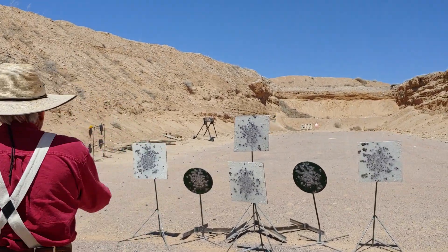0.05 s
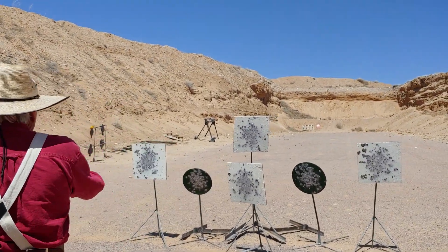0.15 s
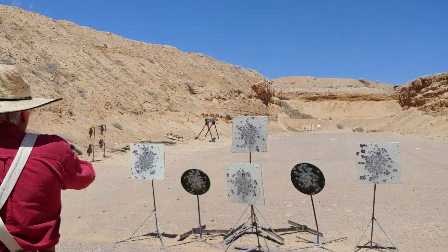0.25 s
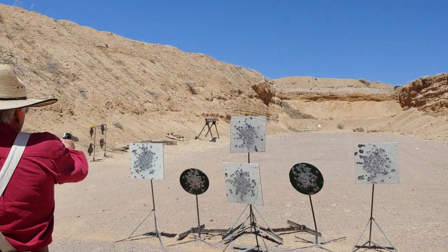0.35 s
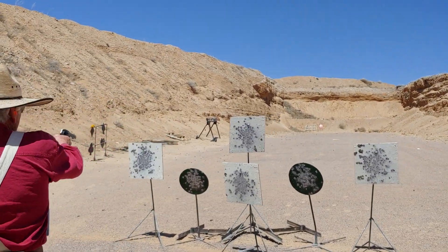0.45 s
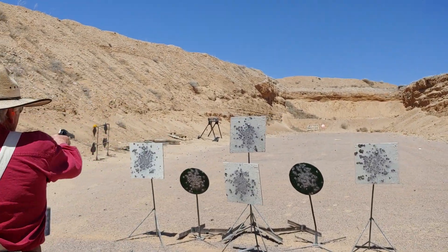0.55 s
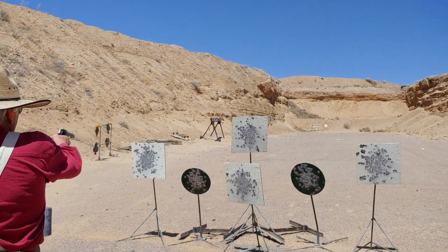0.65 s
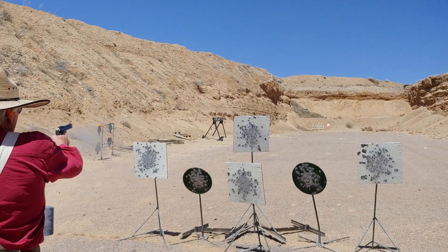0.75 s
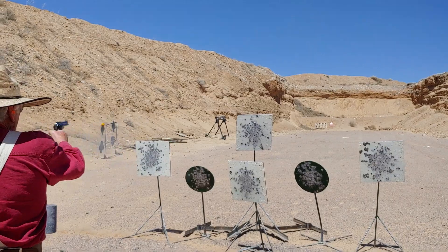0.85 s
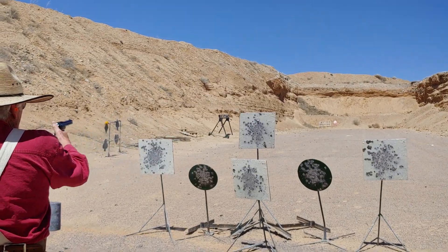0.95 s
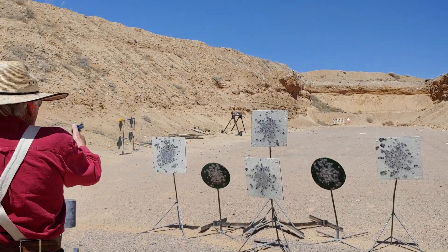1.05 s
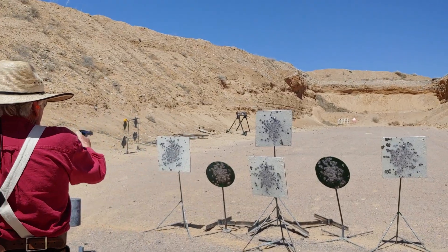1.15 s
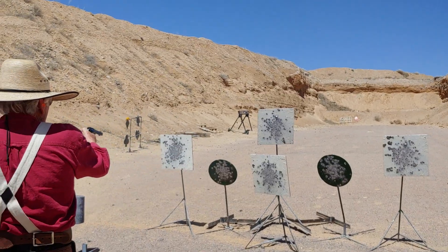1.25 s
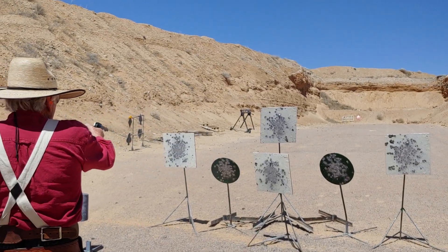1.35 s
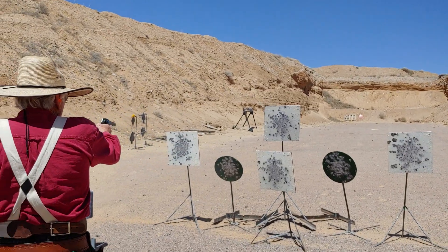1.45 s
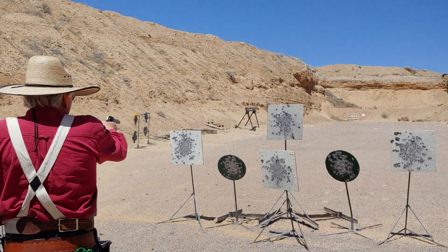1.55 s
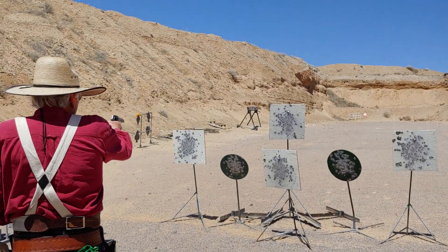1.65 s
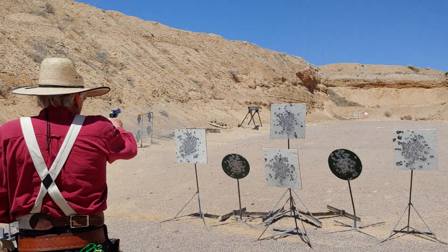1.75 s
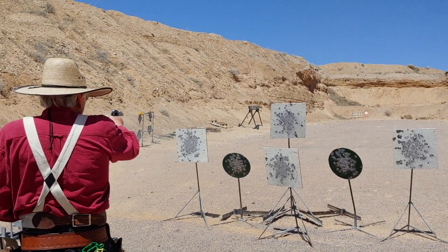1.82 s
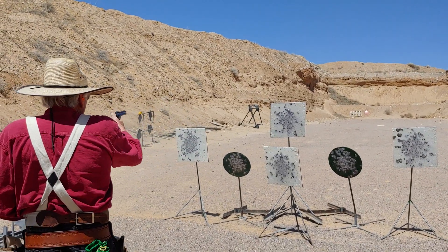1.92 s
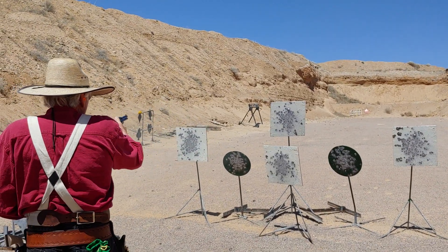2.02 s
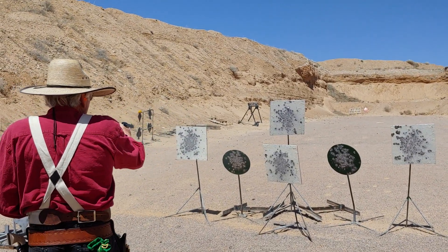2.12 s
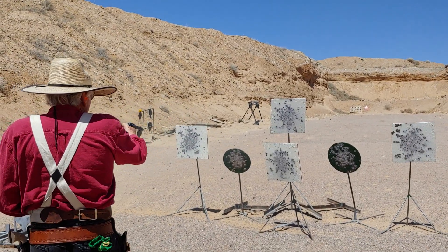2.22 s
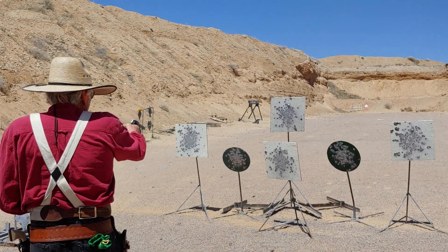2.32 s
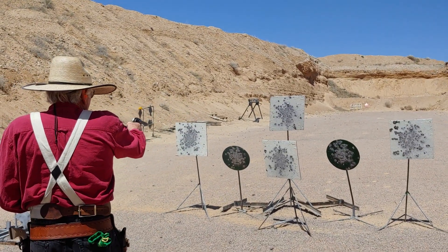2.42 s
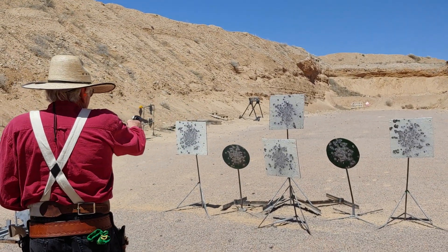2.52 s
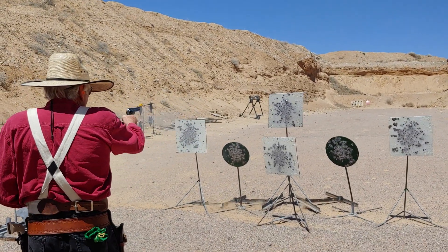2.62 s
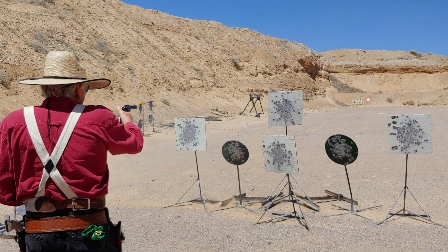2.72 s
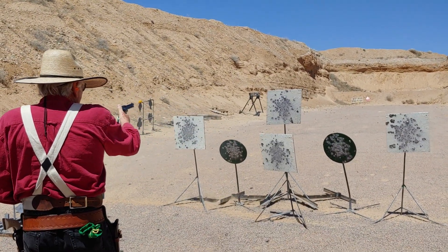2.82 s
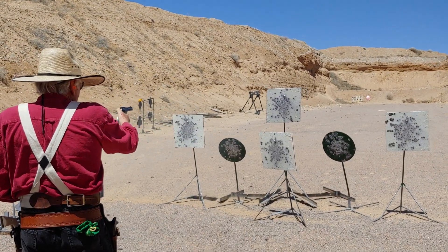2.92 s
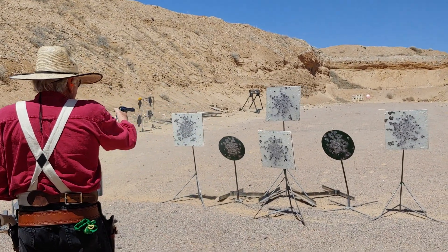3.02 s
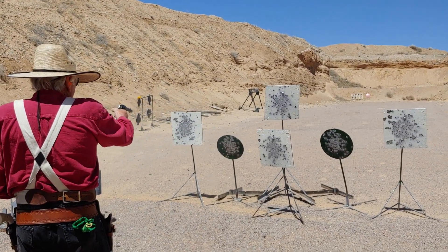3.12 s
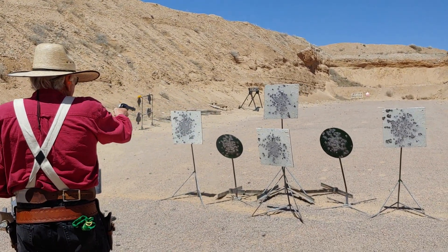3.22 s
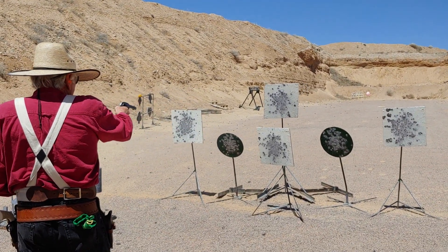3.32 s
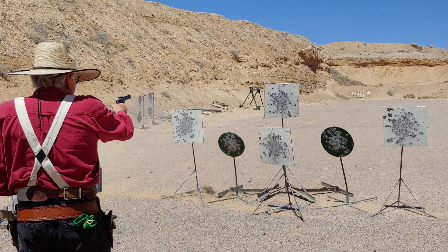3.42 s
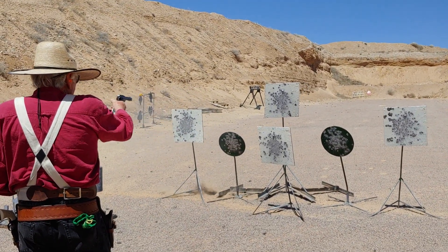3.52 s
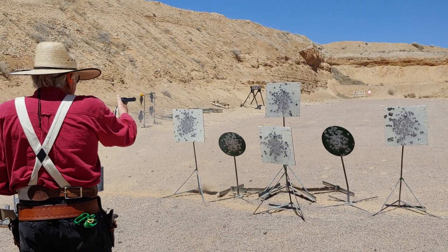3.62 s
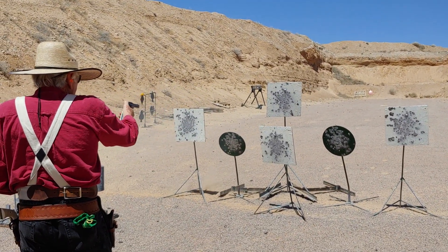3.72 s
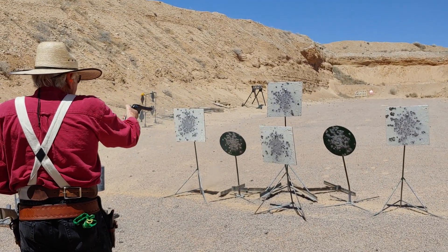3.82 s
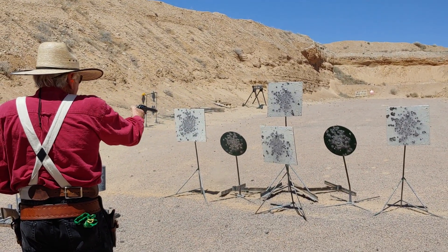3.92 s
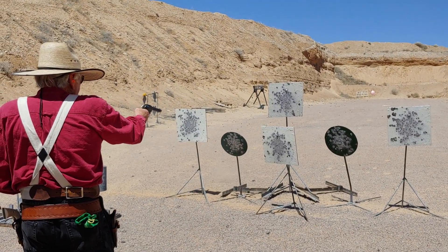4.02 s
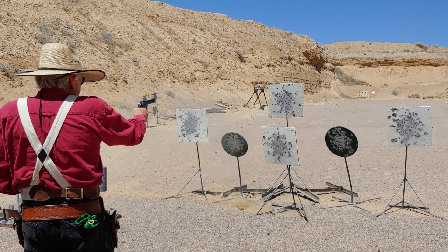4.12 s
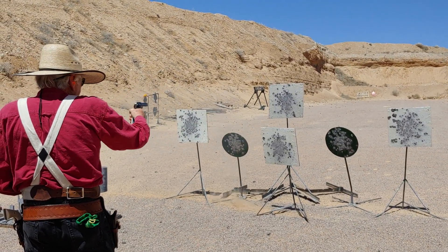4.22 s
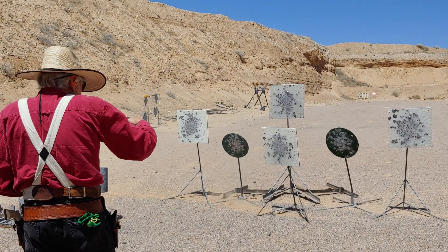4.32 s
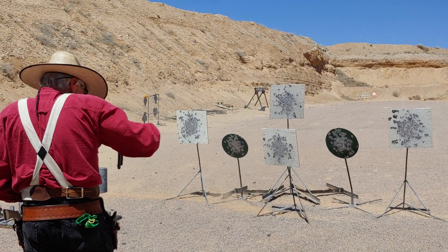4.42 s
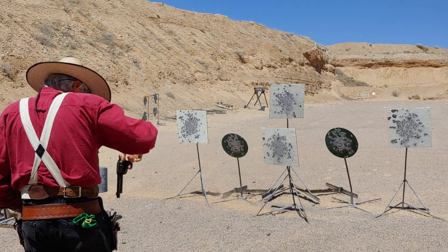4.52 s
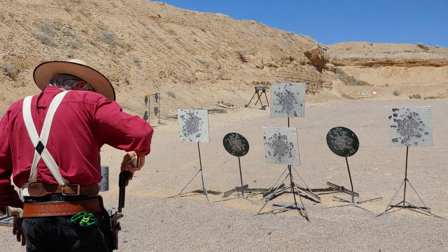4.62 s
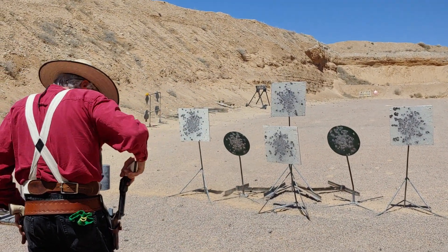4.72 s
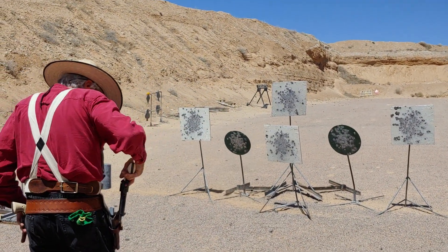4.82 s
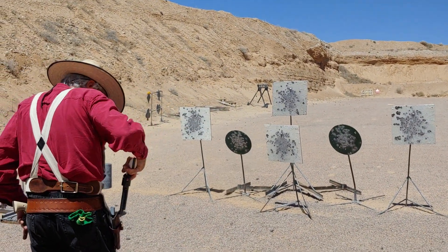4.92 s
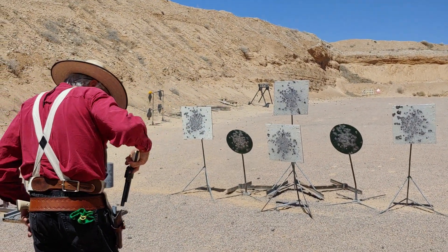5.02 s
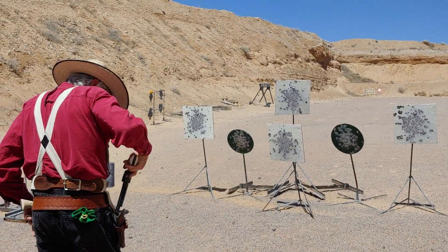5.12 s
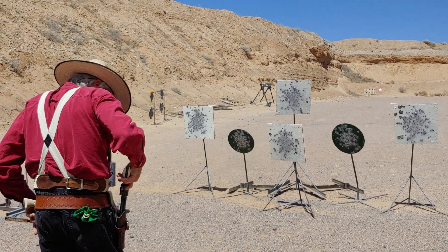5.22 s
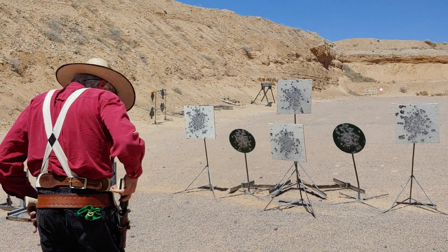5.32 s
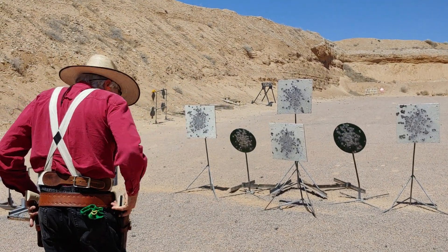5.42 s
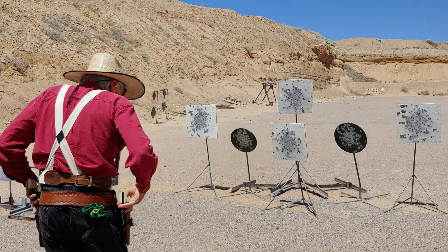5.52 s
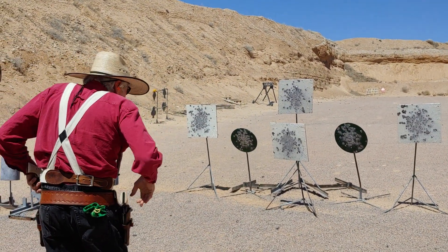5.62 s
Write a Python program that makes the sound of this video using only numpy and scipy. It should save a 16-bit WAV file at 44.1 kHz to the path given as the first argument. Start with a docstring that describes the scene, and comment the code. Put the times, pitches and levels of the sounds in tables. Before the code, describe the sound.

Leather and cloth rustle, then five sharp, overloaded gunshots clang off steel targets outdoors, with cocking clicks between them and wind rumbling on the microphone.

```python
"""Five revolver shots on an open desert range; each bullet rings one of three steel plates a few metres away.
A blast is a pressure pulse with early bounces, a gas roar and a low shove; scattered noise washes back
from the dirt banks and a dull copy returns from a far cliff. The plates ring as banks of dying modes.
Hammer notches, leather and cloth are shaped noise, a metal fitting jingles, and wind buffets two microphone
ports over a far murmur. A gain control ducks on loud sound and recovers."""
import sys
import numpy as np
from scipy import signal
from scipy.fft import rfft, irfft
from scipy.io import wavfile
from scipy.ndimage import uniform_filter1d

SR = 44100
rng = np.random.default_rng(int(sys.argv[2]) if len(sys.argv) > 2 else 0)


def transcribe(u):
    """Save the signal u as a 16-bit wav file named by the first command-line argument.

    u: samples, shape (n,) or (channels, n), limited to [-1, 1]; the rate is SR.
    q: integer samples, one column per channel.
    """
    v = np.clip(np.atleast_2d(u).T, -1, 1)
    q = np.round(v * 32767).astype(np.int16)
    wavfile.write(sys.argv[1], SR, q)


N = 249673

# The five shots. Each row: muzzle blast in seconds, bullet heard landing in seconds.
SHOT_TIMES = [(.8351, .8594), (1.778, 1.8023), (2.6375, 2.6602), (3.453, 3.4760), (4.1441, 4.1639)]
# Balance of each shot. Each row: wash from the banks in dB, lead splash in dB, top level of the minor modes in dB.
SHOT_LEVELS = [(-6, -1.5, -17), (-10, -2.5, -15), (-12, -0.5, -27.5), (-10.5, 1.5, -34.5), (-12, -15, -19)]


def gain_of(db):
    """Decibels to amplitude."""
    return 10 ** (np.asarray(db) / 20)


def evened(x):
    """Scales to unit rms."""
    return x / np.sqrt(np.mean(x ** 2) + 1e-20)


def read(points, hz):
    """Looks a spectrum up on a log-frequency axis."""
    f, value = np.transpose(points)
    return np.interp(np.log(hz + 1), np.log(f + 1), value)


def add(mix, s, sound):
    """Mixes a sound in at s seconds and drops what runs past the end."""
    part = mix[..., round(s * SR):][..., :sound.shape[-1]]
    part += sound[..., :part.shape[-1]]


def noise(spectrum, count, apart):
    """Two channels of coloured noise at unit rms; apart weighs the part that is opposite at the two ports."""
    shared, own = rng.standard_normal((2, count))
    pair = np.array([shared + apart * own, shared - apart * own])
    colour = gain_of(read(spectrum, np.fft.rfftfreq(count, 1 / SR)))
    return evened(irfft(rfft(pair) * colour, count))


def blast(db):
    """A pressure jump with suction behind it, its bounces, the roaring gas jet and the far cliff's dull answer."""
    # When the direct pulse and its bounces off ground and stands are due, in milliseconds.
    arrivals_ms = [0, .65, 1.15, 1.8, 2.4, 3.5, 4.2, 6.3, 12.4, 19.6, 21.]
    # Those same pulses. Each row: typical gain (negative flips the pulse), half period in ms.
    pulses = [(1.1, 0.28), (0.085, 0.07), (0.61, .3), (0.35, 0.12), (0.31, 0.43), (0.26, 0.25),
              (-0.067, 0.37), (.2, 0.32), (-0.31, .35), (-0.39, .7), (0.12, 0.53)]
    # Colour of the gas roar. Each row: frequency in Hz, relative level in dB.
    gas_jet = [(150, -17), (500, 3.5), (1500, -9.5), (3000, -5), (5000, -15.5), (7500, -8), (11000, -17.5),
               (16000, -19)]
    cliff_s, cliff_db = .4345, -32  # delay, and level against the blast

    count = SR // 2
    ms = np.arange(count) * 1000 / SR
    out = np.zeros((2, count))
    chance = rng.standard_normal((len(pulses), 2))
    for delay, (gain, half_period), (shift, size) in zip(arrivals_ms, pulses, chance):
        u = np.clip((ms - delay - .05 * abs(shift)) / half_period, 0, 2)
        out += gain * gain_of(1.2 * size) * np.sin(np.pi * u) * np.exp(-.2 * u)

    roar_fade = gain_of(-11.0 - 60 * ms / 10.0) * np.minimum(ms, 1)
    out += roar_fade * noise(gas_jet, count=count, apart=0.23)

    # a brief bright hiss swells around 5 ms
    hiss = noise([(5000, -26.5), (7500, 0), (10500, -31.5)], count=count, apart=.15)
    out += gain_of(-20.) * np.exp(-((ms - 5) / 2.2) ** 2) * hiss

    # air takes the treble on the way to the cliff and back
    front = out[:, :400] * np.hanning(800)[400:]
    far = signal.lfilter(*signal.butter(2, 1100 / SR * 2), front)
    add(out, cliff_s, gain_of(cliff_db) * far)
    return gain_of(db) * out


def thump():
    """The low shove of the blast, as bass noise that dies fast."""
    level_db, centre_hz, t60_s = -32.5, 70, .08
    t = np.arange(SR // 5) / SR
    colour = [(centre_hz / 5, -12), (centre_hz, 0), (4 * centre_hz, -6), (12 * centre_hz, -50)]
    bass = noise(colour, count=SR // 5, apart=.2)
    return gain_of(level_db - 60 * t / t60_s) * np.minimum(t / .003, 1) * bass


def banks(db):
    """The dirt banks scatter the blast back as a patchy wash; each band dies at its own pace."""
    # Colour of the wash. Each row: frequency in Hz, relative level in dB.
    bank_colour = [(120, -11.5), (400, -14.5), (1500, -5.5), (3000, -12.5), (6000, -18), (9000, -16),
                   (12000, -21.5), (16000, -34)]
    # How long the wash lasts. Each row: frequency in Hz, time to fall 60 dB in seconds.
    bank_t60 = [(200, 0.59), (1000, 0.31), (4000, 0.26), (9000, 0.38), (15000, .2)]

    hz, t, z = signal.stft(noise(bank_colour, count=SR, apart=0.089), SR, nperseg=256)
    # smooth random patches over frequency, then over time
    patches = uniform_filter1d(rng.standard_normal(z.shape[1:]), 9, 0)
    patches = evened(uniform_filter1d(patches, 4, 1))
    fade_db = db + 3.5 * patches - 60 * t / read(bank_t60, hz)[:, None]
    wash = signal.istft(z * gain_of(fade_db), SR, nperseg=256)[1]
    onset = np.minimum(np.arange(wash.shape[1]) / (0.0038 * SR), 1)
    return wash * onset


def splash(db):
    """The lead bullet bursts on the steel: a bright crack and a longer spray of fragments."""
    t = np.arange(SR // 4) / SR
    crack = gain_of(-60 * t / 0.0067)
    spray = gain_of(-6.0 - 60 * t / 0.053)
    colour = [(500, 2.0), (3000, -4.5), (8000, -13.0), (16000, -24)]
    return gain_of(db) * (crack + spray) * noise(colour, count=SR // 4, apart=.15)


def ring(hz, t60, db, seconds):
    """Dying sine modes of struck metal; each wavers slowly and reaches the ports at its own balance and phase."""
    all_pan_db, mode_pan_db = -0.48, 1.03  # left minus right: every mode; spread from mode to mode
    out = np.zeros((2, round(seconds * SR)))
    chance = rng.standard_normal((len(hz), 2))
    for f, life, level, (skew, sway) in zip(hz, t60, db, chance):
        t = np.arange(min(round(1.6 * life * SR), out.shape[1])) / SR
        waver_db = 1.2 * np.sin(2 * np.pi * 2.7 * (1 + 0.12 * skew) * t + 3 * sway)
        fade = gain_of(level + waver_db - 60 * t / life) * np.minimum(t / .002, 1)
        pan = gain_of(np.array([[.5], [-.5]]) * (all_pan_db + mode_pan_db * sway))
        phase = 3 * sway + [[.13 * skew], [-.13 * skew]]
        add(out, 0, fade * pan * np.sin(2 * np.pi * f * t + phase))
    return out


def plates():
    """A bullet sets off main and minor modes; the next one on that plate stops the old main modes."""
    # Main mode frequencies of each plate, in Hz.
    left_hz = [261.8, 399.4, 675.1, 711.9, 847.2, 1159.8, 1335.4, 1447.6, 1666.6, 2159.0, 2626.0, 3201.0,
               3699.0, 3896.0, 4877.0, 5375.0, 5462.0, 5830.0, 6230.0, 6321.0, 6811.0, 7458.0, 7566.0,
               7855.0, 8330.0, 8424.0, 9067.0, 9908.0, 10996.0, 11493.0]
    round_hz = [1488.3, 2281.0, 2471.0, 3431.0, 3475.0, 3990.0, 4704.0, 5139.0, 5653.0, 5974.0, 6206.0,
                6968.0, 7084.0, 7588.0, 7647.0, 7802.0, 8860.0, 9005.0, 9248.0, 9848.0, 10576.0, 11077.0,
                11612.0, 12145.0, 12810.0]
    last_hz = [274.4, 687.7, 855.4, 1170.2, 1355.9, 1455.8, 1684.1, 2191.0, 2351.0, 2659.0, 3241.0, 3655.0,
               3744.0, 3936.0, 4239.0, 4513.0, 4834.0, 4941.0, 5525.0, 6222.0, 6392.0, 6884.0, 7138.0,
               7754.0, 8184.0, 8515.0, 8768.0, 9778.0, 10783.0, 11631.0]
    # Those modes in the same order. Each row: time to fall 60 dB in seconds, then the level in dB
    # for each spot where a bullet lands.
    left_modes = [(0.94, -21, -31), (4.9, -47.5, -51), (2.39, -11.5, -15), (1.36, -14, -21.5),
                  (2.4, -52, -26), (2.5, -24, -30), (1.64, -13, -18.5), (1.8, -18, -46), (1.12, -46.5, -17),
                  (0.66, -11.5, -11.5), (0.84, -13.5, -24), (0.73, -30, -13.5), (0.64, -27.5, -16),
                  (0.31, -15.5, -29.5), (0.54, -19, -6), (0.59, -45, -20.5), (0.37, -32, -2.5),
                  (0.4, -7.5, -20.5), (0.15, -1.5, -4), (0.25, 3, 3.5), (0.31, 2.5, -4), (0.16, -7, -3),
                  (0.4, -6, -41), (0.48, -1.5, -15.5), (0.32, -11.5, -4), (0.4, -3.5, -9),
                  (0.17, -14, -12.5), (0.17, -19, -5), (0.21, -42, -13), (0.3, -22.5, -42.5)]
    round_modes = [(1.174, -25, -24), (0.52, -14.5, -20.5), (0.65, -39, -14.5), (0.72, -17.5, -12),
                   (0.33, -15, -10), (0.75, -22.5, -16.5), (0.13, -18, -76), (0.3, -26, -16.5),
                   (0.78, -42.5, -29), (0.17, -17, -49), (1.52, -49.5, -50), (0.66, -13.5, -20),
                   (0.19, -36, -14), (0.26, -9.5, -20.5), (0.53, -29.5, -40.5), (0.14, -20, -8.5),
                   (0.46, -18.5, -27.5), (0.22, -23, -17), (0.16, -22, -29), (0.46, -26, -23.5),
                   (0.36, -24, -18), (0.12, -17, -25), (0.8, -53, -58), (0.066, -37, -56.5),
                   (0.44, -44, -39.5)]
    last_modes = [(22, -50), (5.64, -19), (8.7, -45.5), (4, -32.5), (1.64, -27.5), (2.7, -42.5),
                  (1.35, -19.5), (0.8, -10), (0.62, -11.5), (0.79, -5), (0.74, -5), (0.22, -14.5),
                  (0.47, -19), (0.55, -25), (0.86, -34.5), (0.47, -15), (0.24, -22.5), (0.6, -7.5),
                  (0.69, -18.5), (0.25, -22), (0.2, -9), (0.36, -15.5), (0.44, -11.5), (0.32, -36),
                  (0.19, -6.5), (0.44, -22.5), (0.18, -14.5), (0.63, -36.5), (0.24, -14), (0.29, -21.5)]
    # which shots, counted from 0, land on which plate
    targets = [(left_hz, left_modes, [0, 1]), (round_hz, round_modes, [2, 3]), (last_hz, last_modes, [4])]

    out = np.zeros((2, N))
    for hz, modes, shots in targets:
        t60, *levels = np.transpose(modes)
        ends = [SHOT_TIMES[k][1] for k in shots[1:]] + [N / SR]
        # minor modes lie at random pitches; the higher ones die sooner
        place, life = rng.random((70, 2)).T
        minor_hz = 2200 + 12000 * place
        minor_t60 = (.12 + .2 * life) * (1.8 - 1.2 * place)
        for k, db, end in zip(shots, levels, ends):
            s, minor_db = SHOT_TIMES[k][1], SHOT_LEVELS[k][2]
            add(out, s, ring(hz, t60, db, min(end - s, 3)))
            sizes_db = minor_db - 16 * rng.random(len(place)) - 24 * np.maximum(place - .55, 0)
            add(out, s, ring(minor_hz, minor_t60, sizes_db, .8))
    return out


def clicks():
    """Steel notches give bright ticks; leather gives duller ones around their own pitch, and many stray ones."""
    # The hammer is drawn back through its notches. Each row: start in seconds, level in dB.
    hammer = [(1.258, -46), (1.386, -51), (2.202, -47.5), (2.334, -49.5), (2.945, -54.5), (3.042, -48.5),
              (3.165, -49), (3.787, -54), (3.884, -45), (4.014, -46.5)]
    # The gun seats in the holster. Each row: start in seconds, level in dB.
    seating = [(5.387, -70), (5.462, -51)]
    # Colour of the steel ticks. Each row: frequency in Hz, relative level in dB.
    lockwork = [(800, -23), (2000, 11), (3500, -8.5), (7000, -2), (10500, -8), (13000, -29), (16000, -44)]
    # Leather and buckle ticks. Each row: start in seconds, level in dB, pitch in Hz, brightness in dB.
    leather = [(0.0308, -42, 1740, -18), (.163, -42, 2000, -25), (0.2, -36, 1670, -32),
               (0.224, -30, 1260, -27), (0.2472, -32.5, 1660, -30), (0.309, -31.5, 1840, -21),
               (0.346, -21.5, 870, -48), (0.44, -35.5, 1300, -15), (0.49, -44.5, 3000, 0),
               (0.5003, -36, 1380, -35), (.575, -51, 1100, -19), (0.591, -49.5, 1800, -6),
               (0.6564, -42, 2390, -32), (0.682, -37.5, 1500, -48), (0.759, -48, 1500, -8),
               (2.3917, -39.5, 1670, -33), (2.414, -37, 1670, -36), (2.436, -47, 1660, -31),
               (5.166, -46.5, 1170, -27), (5.242, -43, 1170, -39), (5.4436, -35, 1530, -30),
               (5.475, -38, 1180, -18), (5.52, -37.5, 600, -53)]
    steel_t60_s, leather_t60_s = .035, .03
    stray_db = 5  # top of the stray ticks over the rustle

    out = np.zeros((2, N))
    t = np.arange(2048) / SR
    onset = np.minimum(t / .001, 1)
    for s, db in hammer + seating:
        fade = gain_of(db - 60 * t / steel_t60_s) * onset
        add(out, s, fade * noise(lockwork, count=2048, apart=0.14))

    when, size, pitch, bright = rng.random((170, 4)).T
    when = when * N / SR
    sizes_db = moving(when) + stray_db - 10 * size
    stray = zip(when, sizes_db, 1000 + 1100 * pitch, -30 + 16 * bright)
    for s, db, hz, bright_db in leather + list(stray):
        colour = [(hz / 3, -16), (hz, 0), (3700, -16), (6500, bright_db), (9000, bright_db - 14), (17000, -55)]
        fade = gain_of(db - 60 * t / leather_t60_s) * onset
        add(out, s, fade * noise(colour, count=2048, apart=0.73))
    return out


def scuffs():
    """Short bright drags of leather as bursts of noise, and a nudged metal fitting as a faint two-mode ring."""
    # Drags of leather. Each row: start in seconds, length in seconds, level in dB.
    drags = [(0.124, 0.014, -45), (0.157, 0.028, -44.5), (0.211, 0.017, -47)]
    # Colour of the drags. Each row: frequency in Hz, relative level in dB.
    drag_colour = [(1500, -10), (4000, -13), (6500, 10), (8500, -18), (12000, -12), (14500, -22),
                   (16000, -45)]
    # Nudges of the fitting. Each row: start in seconds, level in dB.
    jingles = [(.122, -63), (.405, -68), (.47, -58), (.49, -56)]
    # Modes of the fitting. Each row: frequency in Hz, relative level in dB, time to fall 60 dB in seconds.
    fitting = [(8400, -2, 0.22), (14200, -8, .2)]

    out = np.zeros((2, N))
    for s, length, db in drags:
        count = round(length * SR)
        swell = signal.windows.tukey(count, .4)
        add(out, s, gain_of(db) * swell * noise(drag_colour, count=count, apart=0.71))
    hz, mode_db, t60 = np.transpose(fitting)
    for s, db in jingles:
        add(out, s, ring(hz, t60, db + mode_db, .3))
    return out


def moving(t):
    """Level in dB of the shooter's moves: each starts briskly and fades."""
    # Moves of cloth and leather. Each row: start in seconds, length in seconds, level before the fade in dB.
    moves = [(0, 1, -45), (1.4, 0.63, -62), (2.33, 0.37, -54), (3.203, 0.61, -84), (4.94, .7, -65)]
    fade_db = -26  # reached by the end of a move

    power = 1e-12
    for s, length, db in moves:
        u = (t - s) / length
        faded_db = db + fade_db * np.clip(u, 0, 1) ** 2
        edges = np.clip(10 * np.minimum(u + .02, 1 - u), 0, 1)
        power = power + gain_of(2 * faded_db) * edges
    return 10 * np.log10(power)


def rustle():
    """Fibres slip in small grains of uneven size."""
    # Colour of the cloth. Each row: frequency in Hz, relative level in dB.
    cloth = [(180, -26.5), (300, -14.5), (568, -11.5), (680, -9), (898, -6.5), (1970, 5), (3380, -30.5),
             (6730, -14.5), (8880, -28.5), (11900, -33), (15000, -62)]
    grains = gain_of(5.5 * evened(uniform_filter1d(rng.standard_normal(N), 150)))
    grainy = evened(grains * noise(cloth, count=N, apart=0.2))
    return gain_of(moving(np.arange(N) / SR)) * grainy


def wind():
    """Lumpy low pressure, nearly unrelated at the two ports; strong gusts strike the left port."""
    # Course of the wind before its lumps. Each row: time in seconds, level in dB.
    buffets = [(0.0, -38), (0.17, -29.5), (0.35, -39), (0.66, -45), (0.71, -27), (0.8, -18.5), (0.9, -44.5),
               (1.35, -35), (1.549, -47), (1.72, -31.5), (1.87, -47), (2.55, -51), (2.95, -38.5),
               (3.3, -45.5), (3.42, -27.5), (3.56, -56), (3.72, -30), (3.97, -47), (4.099, -38.5),
               (4.27, -46), (4.8, -44), (4.95, -34), (5.2, -26.5), (5.28, -46.5), (5.5, -21.5), (5.66, -28)]
    # Colour of the wind. Each row: frequency in Hz, relative level in dB.
    gust = [(12, -32.5), (20, -16), (54, 4.5), (90, 1.5), (167, -5), (222, -8), (471, -19.5), (600, -25),
            (780, -28.5), (1320, -120)]
    even_db, lean = -46, .55  # each dB above even_db leans this many dB to the left port, below it to the right
    lumps_db = 2.5  # rms lumpiness

    db = np.interp(np.arange(N) / SR, *np.transpose(buffets))
    lumps = uniform_filter1d(rng.standard_normal((2, N)), size=900)
    lumps = evened(uniform_filter1d(lumps, size=900))
    ports = gain_of(np.outer([.5, -.5], lean * (db - even_db)))
    ports = ports / np.sqrt((ports ** 2).mean(0))  # leaning keeps the mean power
    return ports * gain_of(db + lumps_db * lumps) * noise(gust, count=N, apart=.9)


def air():
    """The far murmur of the open range, as soft noise that swells and sinks."""
    # Colour of the murmur. Each row: frequency in Hz, relative level in dB.
    murmur = [(200, -8), (600, -7), (1500, -7), (2500, -11.5), (3500, -23), (7000, -28), (10000, -48),
              (16000, -65.5)]
    level_db = -60  # before the swell
    swell = uniform_filter1d(rng.standard_normal(N), 3000)
    swell = evened(uniform_filter1d(swell, 3000))
    return gain_of(level_db + 3.5 * swell) * noise(murmur, count=N, apart=0.59)


def scene():
    """Shots, plates, shooter and weather."""
    out = plates() + clicks() + scuffs() + wind() + rustle() + air()
    for (s, hit_s), (banks_db, splash_db, _) in zip(SHOT_TIMES, SHOT_LEVELS):
        add(out, s, blast(db=11))
        add(out, s, thump())
        add(out, s, banks(banks_db))
        add(out, hit_s, splash(splash_db))
    return out


def record(dry):
    """Gain control clamps within milliseconds and lets go slowly; peaks still overload; then the band limit."""
    threshold_db, slope, recovery_db_per_s = -25.0, 0.51, 60.  # slope: dB of ducking for each dB over
    edge_hz = 15800

    # the control ignores wind rumble, and its level meter looks back only
    sensed = signal.lfilter(*signal.butter(2, 350 / SR * 2, "high"), dry)
    power = uniform_filter1d((sensed ** 2).mean(0), 600, origin=299)
    power_db = 10 * np.log10(abs(power) + 1e-12)

    # a running maximum that sinks at the recovery rate
    fall = np.arange(N) * recovery_db_per_s / SR
    held_db = np.maximum.accumulate(power_db + fall) - fall
    over_db = np.maximum(held_db - threshold_db, 0)
    ducked = np.clip(dry / gain_of(slope * over_db), -.95, .95)

    low_pass = signal.firwin(511, edge_hz, window=("kaiser", 9), fs=SR)
    padded = np.pad(ducked, [(0, 0), (255, 255)], "reflect")
    return signal.oaconvolve(padded, low_pass[None], "valid")


dry = scene()
out = record(dry)
transcribe(out)
```